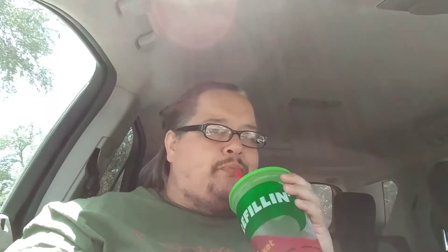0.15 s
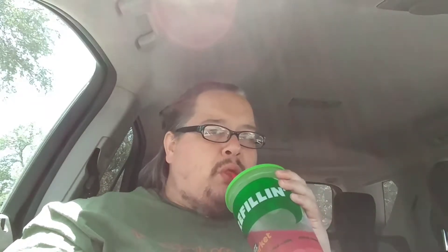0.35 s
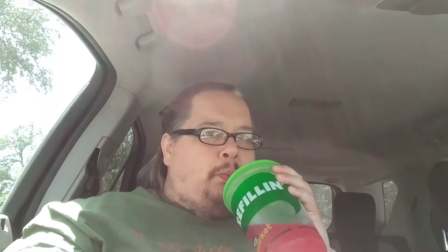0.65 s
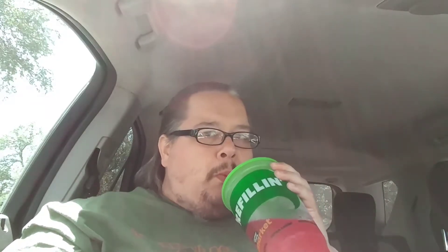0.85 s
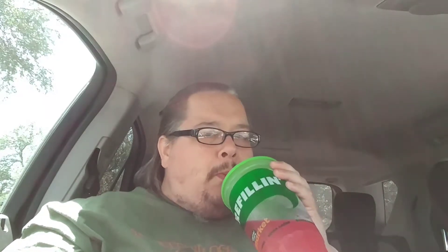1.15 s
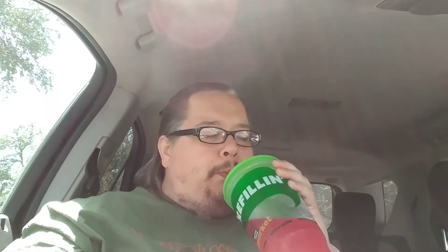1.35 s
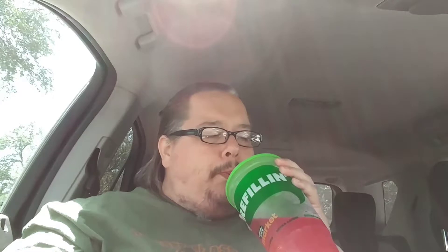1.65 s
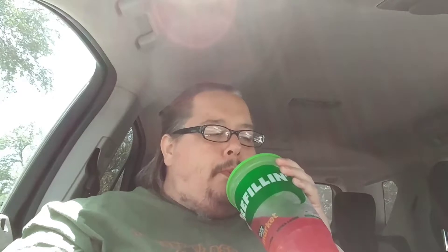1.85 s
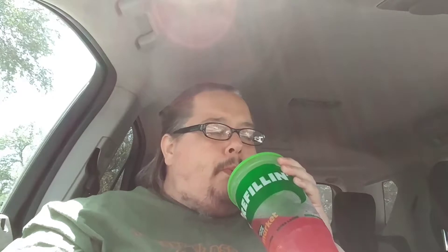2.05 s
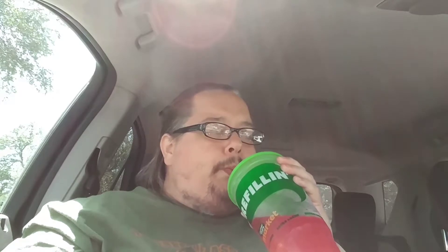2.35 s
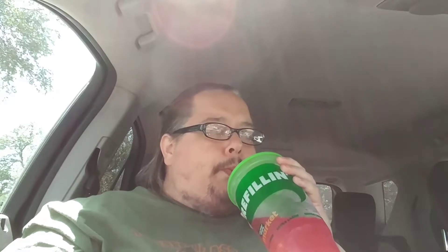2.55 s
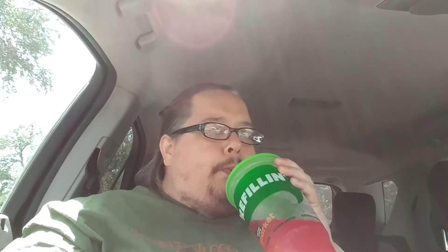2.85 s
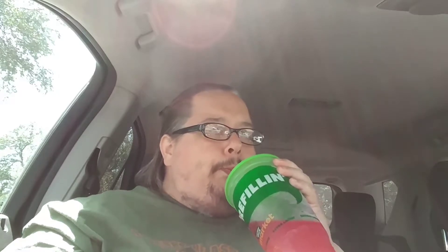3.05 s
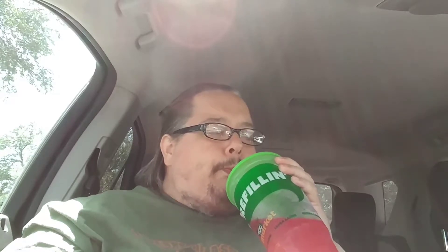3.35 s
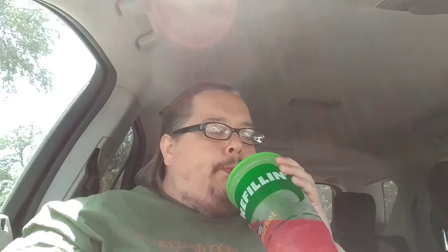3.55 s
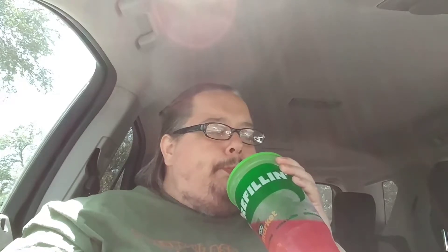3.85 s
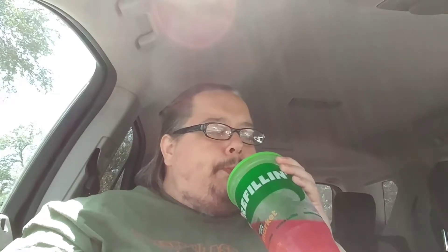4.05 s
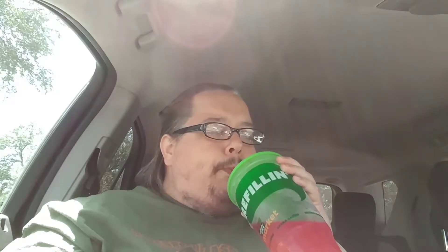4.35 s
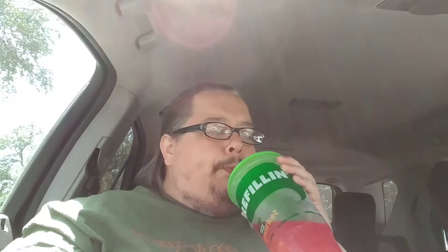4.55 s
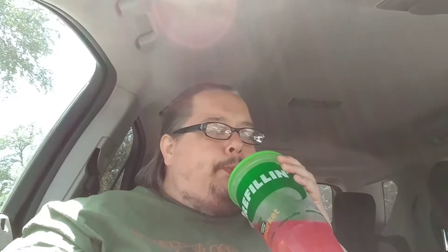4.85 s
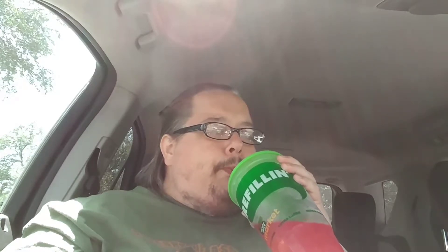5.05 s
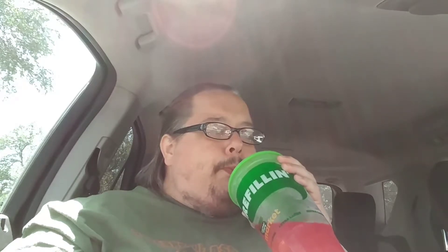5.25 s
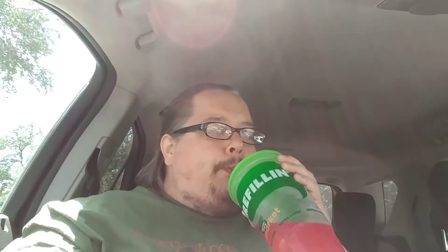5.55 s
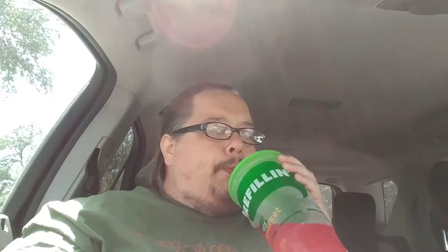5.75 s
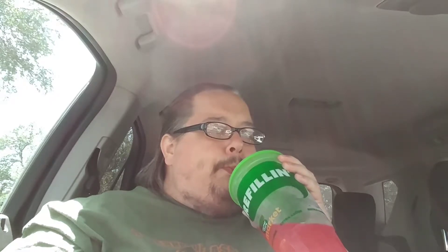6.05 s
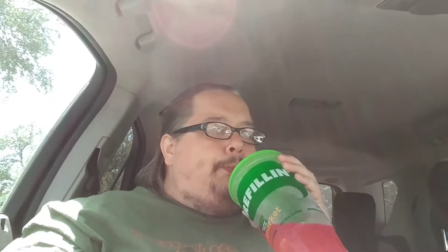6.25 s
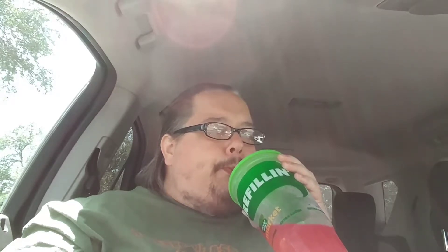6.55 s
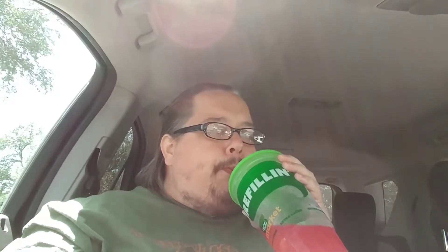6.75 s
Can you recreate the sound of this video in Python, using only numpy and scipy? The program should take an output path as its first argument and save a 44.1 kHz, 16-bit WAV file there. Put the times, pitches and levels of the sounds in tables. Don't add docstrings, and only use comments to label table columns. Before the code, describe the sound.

Air conditioning blows steadily in a closed, idling car, low rumble and vent hiss constant, with one faint plastic cup crackle near the start.

```python
import sys
import numpy as np
from scipy import signal
from scipy.fft import rfft, irfft
from scipy.io import wavfile

SR = 44100
rng = np.random.default_rng(int(sys.argv[2]) if len(sys.argv) > 2 else 0)


def output_pcm(signal):
    pcm = np.clip(np.atleast_2d(signal).T, -1, 1) * 32767
    wavfile.write(sys.argv[1], SR, np.round(pcm).astype(np.int16))


def magnitude_from_level(level_db):
    exponent = np.asarray(level_db, float) / 20
    return 10 ** exponent


N = 304731


def rms_one(x):
    return x / np.sqrt(np.mean(x ** 2) + 1e-20)


def drift(rate_hz):
    hop, settle = 40, 2000
    pole = np.exp(-2 * np.pi * rate_hz * hop / SR)
    sparse = rng.standard_normal(N // hop + 2 + settle)
    slow = signal.lfilter([1], [1, -2 * pole, pole * pole], sparse)[settle:]
    slow = rms_one(slow - slow.mean())
    return np.interp(np.arange(N) / hop, np.arange(len(slow)), slow)


def band_pass(x, order, low_hz, high_hz):
    return signal.sosfilt(signal.butter(order, [low_hz, high_hz], "band", fs=SR, output="sos"), x)


def sleeve():
    # start_s (middle of the swell), half_length_s, level_db (rms)
    brushes = [
        (6.425, .025, -52.5),
        (.933, .018, -54),
    ]
    t = np.arange(N) / SR
    hiss = rms_one(band_pass(rng.standard_normal(N), 3, 13600, 16000))
    swell = np.zeros(N)
    for middle_s, half_s, level_db in brushes:
        swell += magnitude_from_level(level_db) * np.exp(-.5 * ((t - middle_s) / half_s) ** 2)
    return hiss * swell


def lid():
    # start_s, level_db (peak), pitch_hz (ring)
    snaps = [
        (.9095, -33, 8000),
        (.915, -28, 11000),
        (.9203, -26, 14000),
        (.9268, -23, 10800),
        (.9365, -27, 14000),
        (.9405, -21, 14000),
        (.9525, -30, 9500),
        (.9625, -30, 13500),
        (.9662, -28, 13500),
    ]
    out = np.zeros(N)
    t = np.arange(200) / SR
    decay = np.exp(-t / .0006)
    for start_s, level_db, pitch_hz in snaps:
        puff = rng.standard_normal(len(t))
        snap = decay * (puff + 1.2 * np.sin(2 * np.pi * pitch_hz * t))
        start = round(start_s * SR)
        out[start:start + len(t)] += magnitude_from_level(level_db) * .19 * rms_one(snap)
    return band_pass(out + 1e-18, 2, 6000, 15500)


def whistle(pitch_hz, width_hz, level_db):
    gusts_hz, swing_db = 5.0, 1.5
    b, a = signal.iirpeak(pitch_hz, pitch_hz / width_hz, fs=SR)
    once = signal.lfilter(b, a, rng.standard_normal(N))
    tone = signal.lfilter(b, a, once)
    return magnitude_from_level(level_db + swing_db * drift(gusts_hz)) * rms_one(tone)


def rotor(turn_hz, orders, wander, throb_db):
    angle = 2 * np.pi * np.cumsum(turn_hz * (1 + wander * drift(0.54))) / SR
    hum = np.zeros(N)
    for order, level_db in orders:
        strength = np.sqrt(2) * magnitude_from_level(level_db + throb_db * drift(2.2))
        hum += strength * np.sin(round(order) * angle + 2 * np.pi * rng.random())
    return hum


def engine():
    # order (multiple of its speed), level_db (rms)
    crank_lines = [(2, -45), (4, -21.5)]
    return rotor(15.0, crank_lines, wander=0.012, throb_db=0.0)


def blower_shaft():
    # order (multiple of its speed), level_db (rms)
    shaft_lines = [(1, -26.5), (4, -43), (5, -43), (6, -33.5), (12, -44)]
    return rotor(45.8, shaft_lines, wander=0.00296, throb_db=-1.5)


def turbulence(spectrum, modes):
    hz = np.maximum(np.fft.rfftfreq(N, 1 / SR), 1)
    knot_hz, knot_db = np.transpose(spectrum)
    colour_db = np.interp(np.log(hz), np.log(knot_hz), knot_db, left=-120, right=-120)
    for centre_hz, width_hz, peak_db in modes:
        colour_db = colour_db + peak_db / (1 + (2 * (hz - centre_hz) / width_hz) ** 2)
    return rms_one(irfft(rfft(rng.standard_normal(N)) * magnitude_from_level(colour_db), N))


def body_rumble(flutter):
    # pitch_hz, level_db (per Hz)
    colour = [(22, -36), (35, -33), (42, -6), (52, -7.5), (80, -0.5), (100, -8), (160, -11), (280, -11.5),
              (330, -22), (420, -27)]
    # pitch_hz, width_hz, level_db
    panels = [(68, 5, -3), (81, 16, 2.5), (100, 8, -1), (112, 12, 4.5), (127, 12, -4.5), (144, 18, 2.5),
              (165, 12, -2.5), (190, 45, 3), (240, 14, -4), (285, 30, 2)]
    level_db = -15.5 + 0.05 * drift(0.46) + 0.36 * flutter + 1.13 * drift(3.9)
    return magnitude_from_level(level_db) * turbulence(colour, panels)


def duct_rush(flutter):
    # pitch_hz, level_db (per Hz)
    colour = [(180, -32), (300, -4.5), (400, -6), (544, -5), (750, -12), (1000, -13.5), (1300, -13),
              (1700, -16.5), (2050, -14.5), (2400, -20), (3200, -23), (4160, -57), (7040, -120)]
    # pitch_hz, width_hz, level_db
    ducts = [(412, 12, 2), (462, 55, 4.5), (505, 30, -2), (540, 35, 3), (582, 22, -4), (597, 12, 2),
             (640, 70, -1.5), (702, 26, -6), (745, 80, 4.5), (870, 50, 2), (950, 80, -3), (1060, 50, -3),
             (1110, 50, 3), (1200, 110, 3), (1260, 28, -5), (1300, 50, 2), (1580, 35, -5), (1630, 40, 4),
             (1675, 45, 4), (1785, 60, -5), (1850, 60, 3), (1905, 30, -4), (1945, 40, 2), (1985, 40, 3),
             (2035, 60, -3), (2105, 55, 3.5), (2195, 60, -4), (2510, 40, 3), (2750, 70, 4), (2835, 60, -4)]
    level_db = -23.5 + 0.3 * flutter + 0.34 * drift(8.1)
    return magnitude_from_level(level_db) * turbulence(colour, ducts)


def vent_hiss(flutter):
    # pitch_hz, level_db (per Hz)
    colour = [(1710, -25), (2900, -9.5), (3660, -7), (4750, -9.5), (5270, -7), (6200, -5), (6700, 1),
              (7290, -6), (9200, -16.5), (10000, -22), (11200, -24), (11700, -28.5), (13500, -30),
              (16500, -38)]
    # pitch_hz, width_hz, level_db
    vents = [(3050, 90, -3), (3250, 50, 2), (3540, 70, 2), (3670, 50, 2), (4010, 60, -2), (4095, 40, 2),
             (4150, 40, -2), (4200, 40, 2), (4510, 90, 2), (5210, 70, 3), (5820, 60, 2), (5960, 90, 3),
             (6070, 90, -2), (6420, 30, -2), (6480, 90, 2), (6610, 60, 2), (6665, 30, -4), (6770, 50, -2),
             (6860, 110, 3), (7010, 50, -3), (7180, 90, -2), (7260, 90, 2), (7650, 300, -2), (8080, 200, 2),
             (8400, 100, -2), (8550, 150, 1), (9150, 150, 2), (9300, 120, -2)]
    level_db = -29.5 + 0.3 * flutter + 0.25 * drift(9.3)
    return magnitude_from_level(level_db) * turbulence(colour, vents)


def air():
    flutter = drift(18)
    return body_rumble(flutter) + duct_rush(flutter) + vent_hiss(flutter)


def scene():
    hum = engine() + blower_shaft()
    slats = whistle(1664, 45, -40) + whistle(2114, 35, -47.5)
    return np.tile(hum + air() + slats + lid() + sleeve(), (2, 1))


def roll_off(x):
    return signal.sosfilt(signal.butter(12, 15730, fs=SR, output="sos"), x)


def record(dry):
    rounded = 1.612 * np.tanh(dry / 1.584)
    heard = signal.sosfilt(signal.butter(2, 22, "high", fs=SR, output="sos"), rounded)
    return roll_off(heard)


dry = scene()
out = record(dry)
output_pcm(out)
```